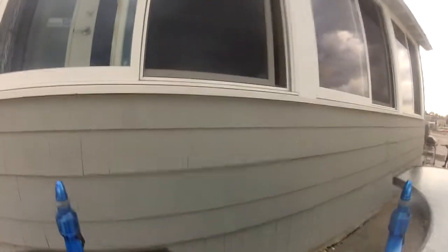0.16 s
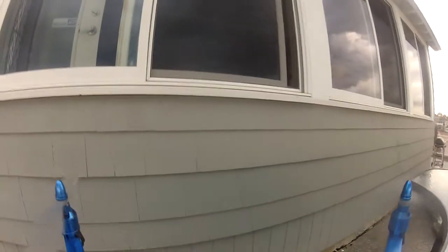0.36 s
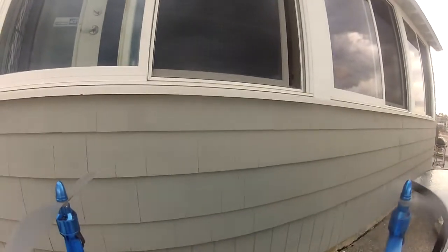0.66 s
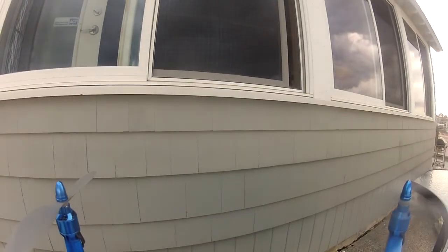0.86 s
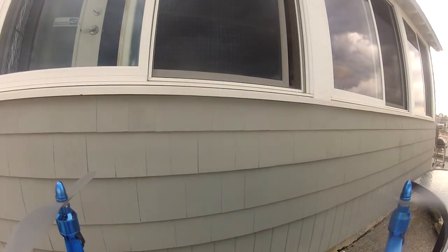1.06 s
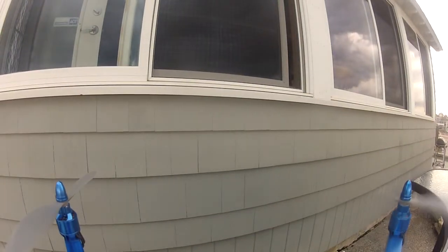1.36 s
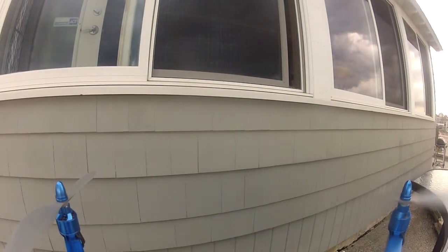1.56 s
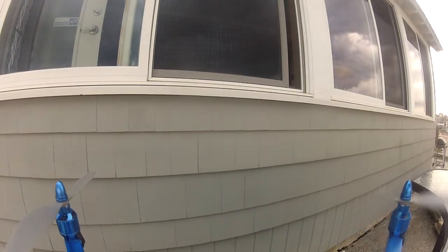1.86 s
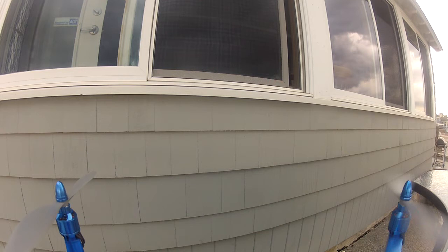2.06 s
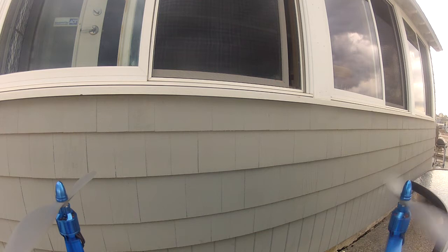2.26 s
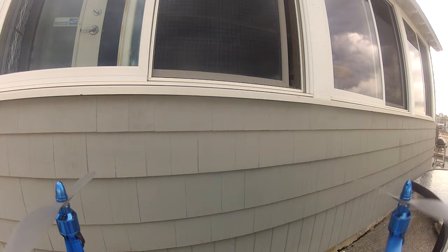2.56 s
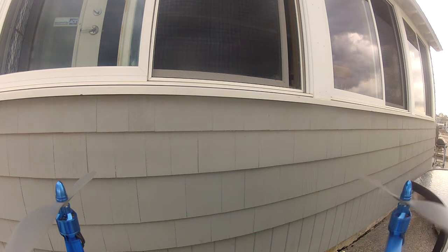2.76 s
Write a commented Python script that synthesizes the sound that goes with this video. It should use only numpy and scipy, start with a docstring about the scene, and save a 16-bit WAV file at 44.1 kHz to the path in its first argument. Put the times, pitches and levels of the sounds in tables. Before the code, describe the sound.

A small drone's motors wind down after it hits the ground with a sharp clatter. The whine falls in pitch and fades, with rattling, plastic ticks and dying propeller rumble, heard outdoors from a microphone on the drone.

```python
"""Outdoors at ground level, on the microphone of a camera fixed to a small drone's frame, close and dry.
The drone knocks down and its motors coast to a stop. The nearest rotor cogs ever slower, its orders
gliding down through the frame's resonances; the frame hums, bearings rattle, a rotor rubs, plastic snaps
and the propeller wash dies away. The camera holds each sample of a slow converter, which mirrors the
sound into the treble."""
import sys
import numpy as np
from scipy.fft import rfft, irfft, next_fast_len
from scipy.io import wavfile
from scipy.ndimage import map_coordinates

SR = 44100
rng = np.random.default_rng(int(sys.argv[2]) if len(sys.argv) > 2 else 0)


def to_wav(sig):
    """Store sig (one row per channel, or 1-D mono) as 16-bit WAV at the path in sys.argv[1].

    Samples outside -1..1 are clipped; the rate is SR.
    """
    pcm = np.clip(np.atleast_2d(sig), -1, 1) * 32767
    pcm = np.round(pcm).astype(np.int16)
    wavfile.write(sys.argv[1], SR, pcm.T)  # frames by channels


N = 127890
T = np.arange(N) / SR

# the rotor coasting down (time [s], speed [turns/s])
ROTOR_SPEED = [(0, 45.5), (.22, 38), (.36, 30.8), (.55, 26.7), (.7, 21.7), (.85, 19.4), (1.0, 16.84),
               (1.2, 14.1), (1.42, 11.4), (1.61, 9.78), (1.85, 7.72), (2.13, 5.96), (2.35, 4.82),
               (2.6, 3.39), (2.9, 1.75)]
# fade of the bearing rattle (time [s], relative level [dB])
RATTLE_FADE = [(0.04, -34), (0.22, -34), (0.37, -30), (0.59, -42), (0.77, -43.5), (1.12, -53), (1.5, -59.5),
               (2.37, -73), (2.9, -89.5)]
# resonances of the shell (frequency [Hz], gain [dB])
SHELL_RESPONSE = [(200, 1), (520, -24.5), (750, -13), (930, 0), (1080, -8), (1250, 1), (1400, -10.5),
                  (1560, -3.5), (1650, -4.5), (1780, 5.5), (2030, -9), (2250, 0), (2480, -6), (2620, -33),
                  (2820, -8.5), (3150, -31), (3650, -9), (4300, -49), (4900, -24.5), (5900, -52)]


def amp(db):
    """Decibels to gain."""
    return 10 ** (np.asarray(db) / 20)


def unit(x):
    """Scale to rms 1."""
    return x / np.sqrt(np.mean(x ** 2) + 1e-20)


def curve(rows, column=1):
    """One value per sample from a column of a time table."""
    rows = np.array(rows)
    return np.interp(T, rows[:, 0], rows[:, column])


def gain(points, hz):
    """Gain at hz from (frequency [Hz], gain [dB]) points on a log axis."""
    f, db = np.transpose(points)
    return amp(np.interp(np.log(hz + 1), np.log(f), db))


def wobble(rate):
    """A smooth random curve, rate knots a second."""
    return map_coordinates(rng.standard_normal(400), [T * rate], mode="wrap")


def filtered(x, response):
    """Filter x by a function of frequency."""
    size = next_fast_len(N + SR // 2)
    return irfft(rfft(x, size) * response(np.fft.rfftfreq(size, 1 / SR)), size)[:N]


def coloured(x, colour):
    """Shape x by (frequency [Hz], gain [dB]) points, at rms 1."""
    return unit(filtered(x, lambda hz: gain(colour, hz)))


def noise(colour):
    """Noise of rms 1, shaped by (frequency [Hz], gain [dB]) points."""
    return coloured(rng.standard_normal(N), colour)


def swell(start, rise):
    """A brief rise and fall that peaks rise seconds after its start."""
    u = np.maximum(T - start, 0) / rise
    return u ** 2 * np.exp(1 - u ** 2)


def landing():
    """The frame hits the ground in a quick clatter over one low thump."""
    # ground contacts (time [s], relative level [dB], rise [s])
    knocks = [(.0005, -13.5, 0.0028), (.0078, -9.5, 0.0015), (0.0176, -12.5, 0.003), (.022, -12, 0.003),
              (0.027, -6, 0.0017)]
    # high and low rings of the frame (frequency [Hz], relative level [dB], t60 [s])
    knock_modes = [(1130, -1, 0.02), (1258.7, -13, 0.1), (1870, 0, 0.048), (2353.8, 2, 0.026),
                   (3626, -1.5, 0.018)]
    thump_modes = [(45, -8, 0.092), (149.6, -12, 0.16)]
    crack = noise([(200, 4), (550, -9), (1100, -8), (1900, 3), (2700, -5.5), (3200, -12.5),
                   (3800, -24.5), (4500, -15), (6000, -26)])
    clatter = np.zeros(N)
    for start, db, rise in knocks:
        age = np.maximum(T - start, 0)
        ring = sum(amp(level - 60 * age / t60) * np.sin(2 * np.pi * hz * rng.normal(1, .0097) * age)
                   for hz, level, t60 in knock_modes)
        clatter += amp(db) * (.75 * crack * swell(start - .0005, rise) + .53 * ring)
    thump = sum(amp(db - 60 * T / t60) * np.sin(2 * np.pi * hz * T) for hz, db, t60 in thump_modes)
    return clatter + thump


def motor_whine():
    """Cogging orders fall through the frame's resonances; a lurch once a turn splits each line."""
    # strong orders of twelve slots and fourteen magnets (multiple of the shaft rate)
    orders = [12, 14, 24, 28, 36, 48, 56, 60, 70, 84, 98, 112, 120, 132, 140, 154, 168]
    # strength of each of them (relative level [dB])
    orders_db = [-11.5, 0, -15, 0, 5, 5.5, -4.5, -1, 3, 6.5, 2, -6, -4, -4, -5.5, 2.5, 4]
    # how the frame passes the whine (frequency [Hz], gain [dB])
    frame_response = [(60, -18.5), (150, -4), (230, 0.5), (310, -2.5), (380, -18), (460, -15), (560, -30),
                      (660, -14.5), (720, -21.5), (830, -4), (930, 0.5), (1050, -7), (1150, -9.5),
                      (1260, -10.5), (1450, -17.5), (1750, -15.5), (2050, -22), (2300, -18.5),
                      (2700, -38.5), (4400, -58)]
    # swell and fade of the whine (time [s], relative level [dB])
    fade = [(0, -54), (.15, -29), (.32, -23.5), (.45, -27.5), (.57, -28.5), (.7, -34), (.83, -34),
            (1.05, -40), (1.25, -42.5), (1.45, -46), (1.7, -50), (1.9, -52), (2.15, -57.5), (2.45, -61),
            (2.9, -69.5)]
    flutter, lurch_rad = .006, .012
    speed = curve(ROTOR_SPEED) * (1 + flutter * wobble(25))
    angle = 2 * np.pi * np.cumsum(speed) / SR
    angle += lurch_rad * np.sin(angle)
    strong, whine = dict(zip(orders, orders_db)), np.zeros(N)
    for k in sorted({*range(2, 130, 2), *range(1, 56, 2), *orders}):
        if k in strong:
            db = strong[k] + 2.5 * wobble(13.86) + 4.5 * wobble(70)  # slow shimmer, fast rasp
        else:
            db = rng.normal(-10, 2)
        whine += amp(db) * gain(frame_response, k * speed) * np.sin(k * angle + rng.uniform(0, 2 * np.pi))
    return amp(curve(fade) - 7.5) * whine


def bending_mode(levels, pitch, wander, shake):
    """One low mode of the frame hums; random shaking unsettles its level and phase."""
    hz = curve(pitch) * (1 + wander * wobble(30))
    phase = 2 * np.pi * np.cumsum(hz) / SR + rng.uniform(0, 2 * np.pi)
    tone = (1 + shake * wobble(45)) * np.sin(phase) + shake * wobble(45) * np.cos(phase)
    return amp(curve(levels)) * unit(tone)


def frame_hum():
    """The frame under the microphone bends in two low modes."""
    # strength of each mode (time [s], relative level [dB])
    lower_db = [(0.04, -20), (0.06, -24), (0.46, -17), (0.52, -33), (0.54, -27), (0.87, -37.5), (0.92, -36),
                (1.04, -30), (1.15, -60), (1.2, -41.5), (2.01, -54), (2.27, -37), (2.59, -60.5),
                (2.87, -40), (2.9, -51.5)]
    upper_db = [(0.0, -17), (0.14, -18.5), (0.44, -17), (0.45, -25.5), (0.68, -32), (0.7, -34.5),
                (0.9, -36), (1.07, -50.5), (1.44, -52), (1.61, -35.5), (1.66, -57), (1.7, -37), (2.45, -51),
                (2.56, -37.5), (2.9, -67.5)]
    # pitch of each mode (time [s], frequency [Hz])
    lower_hz = [(0, 78.66), (.4, 72.9), (1.401, 75.99), (2.9, 73.29)]
    upper_hz = [(0, 127.8), (0.082, 99), (.45, 101.4), (0.621, 114.3), (0.999, 113.3), (1.58, 125.5),
                (1.72, 124.9), (1.839, 108.1), (1.96, 124.3), (2.15, 110.8), (2.57, 124), (2.801, 101)]
    lower = bending_mode(lower_db, lower_hz, wander=.02, shake=.38)
    upper = bending_mode(upper_db, upper_hz, wander=.028, shake=.61)
    return amp(-4) * lower + amp(-3) * upper


def propeller_wash():
    """Air from the propellers rumbles at the microphone and dies away."""
    # strength of the wash (time [s], relative level [dB])
    fade = [(0.0, -58), (0.08, -25), (0.37, -23.5), (0.5, -29), (0.62, -34), (1.1, -45.5), (1.5, -55.5),
            (2.0, -54.5), (2.9, -62.5)]
    # its spectrum (frequency [Hz], gain [dB])
    colour = [(10, -4.5), (17, 4.5), (28, -4), (50, 3.5), (120, 6), (165, -4), (240, -13.5), (320, -10),
              (380, -20.5), (550, -28.5), (900, -33.5), (3000, -54.5)]
    return amp(curve(fade) + 2) * noise(colour)


def outdoor_air():
    """A faint, steady outdoor background."""
    # spectrum of the air (frequency [Hz], gain [dB])
    colour = [(30, -9), (100, 3.5), (300, -8), (600, -13), (1200, -16), (2500, -20.5), (4800, -25),
              (6000, -35)]
    return amp(-62.5) * noise(colour)


def bearing_rattle(hits_per_s=870):
    """Dense small impacts in the bearings ring the shell."""
    hits = (rng.random(N) < hits_per_s / SR) * rng.standard_normal(N)
    return amp(curve(RATTLE_FADE) + .5 + 2.1 * wobble(60)) * coloured(hits, SHELL_RESPONSE)


def crackle(ticks_per_s=180, end_s=1.17):
    """Sparse sharp ticks while the rotors are still fast."""
    hits = (rng.random(N) < ticks_per_s / SR) * rng.uniform(.3, 1, N) * rng.choice([-1, 1], N)
    ticks = coloured(hits, [(1000, -8.5), (3500, 3.5), (6000, -19)])
    rattle_db = curve(RATTLE_FADE)
    db = rattle_db.max() + .65 * (rattle_db - rattle_db.max())  # fades more slowly than the rattle
    return amp(db - 25.5) * ticks * (T < end_s)


def rotor_rubs():
    """A rotor rubs in passing and rings the shell; the rubs lengthen as it slows to 9 turns/s."""
    # contacts (time [s], relative level [dB])
    contacts = [(0.048, -19), (0.079, -10.5), (0.1047, -27), (0.141, -24.5), (0.175, -9), (0.195, -16),
                (0.2303, -22), (0.264, -22), (0.2728, -12), (0.3203, -15.5), (0.333, -9.5), (0.3616, -8),
                (0.383, -16.5), (0.4306, -17), (0.4482, -17), (0.4905, -13), (0.5292, -22), (0.55, -24),
                (0.577, -24.5), (0.5981, -14.5), (0.6287, -17.5), (0.649, -28), (0.675, -29),
                (0.7373, -25.5), (0.79, -26.5), (0.823, -23), (0.8643, -29), (0.897, -32.5), (0.9152, -26),
                (0.9275, -27), (0.9806, -26.5), (1.0375, -35), (1.1014, -40), (1.1255, -24.5),
                (1.1629, -33.5), (1.1954, -28), (1.231, -35), (1.3767, -36.5), (1.5019, -36.5),
                (1.5915, -32), (1.689, -31), (1.8006, -36.5), (1.931, -36.5), (1.9907, -39.5),
                (2.003, -37.5), (2.068, -34.5), (2.2454, -43), (2.3506, -50.5), (2.5709, -52.5)]
    # treble lost in a soft contact (frequency [Hz], gain [dB])
    softness = [(2500, -2.5), (3600, -11), (5000, -8)]
    rise_turns = .045
    speed, rubs = curve(ROTOR_SPEED), np.zeros(N)
    hz = np.fft.rfftfreq(SR // 8, 1 / SR)
    for time, db in contacts:
        rise = rise_turns / max(np.interp(time, T, speed), 9) + .0047
        shift = 1 + .03 * rng.uniform(-.86, 1)  # the ring moves with the point of contact
        ring = gain(SHELL_RESPONSE, hz * shift) * gain(softness, hz)
        grain = unit(irfft(ring * np.exp(2j * np.pi * rng.random(len(hz)))))
        rubs += amp(db - 9.5) * swell(time - .73 * rise, rise) * np.resize(grain, N)
    return rubs


def plastic_snaps():
    """Short bright snaps of plastic while the frame still shakes."""
    # snaps (time [s], relative level [dB])
    snaps = [(0.0664, -34), (0.2772, -37.5), (0.3334, -32.5), (0.3846, -35), (0.4475, -44), (0.4949, -41),
             (0.5532, -35), (0.5982, -42), (0.9643, -50), (0.9793, -62), (1.0169, -53), (1.0704, -56)]
    envelope = sum(amp(db - .5) * swell(time - .0005, rise=.0017) for time, db in snaps)
    return envelope * noise([(1500, -5.5), (3600, 2.5), (4300, -8.5), (5000, 0), (6000, -17)])


def squeal():
    """One thin falling squeal with a flickering level."""
    # its glide (time [s], frequency [Hz], level [dB])
    glide = [(.63, 4030, -62), (.69, 3760, -57.5), (.73, 3707, -49.5), (.775, 3500, -50.5),
             (.795, 3200, -60), (.81, 3100, -100)]
    tone = np.sin(2 * np.pi * np.cumsum(curve(glide)) / SR)
    return amp(curve(glide, column=2) + 1.7 * wobble(59.9)) * tone * (T > glide[0][0])


def click():
    """One small click late in the run-down."""
    burst = noise([(1500, -20), (2400, 4.5), (2900, 4.5), (4000, -5), (6000, -21.5)])
    return amp(-58) * swell(start=2.195, rise=.017) * burst


def scene():
    """Everything meets at the one microphone on the frame, with no room."""
    mix = landing() + motor_whine() + frame_hum() + propeller_wash() + outdoor_air()
    mix += bearing_rattle() + crackle() + rotor_rubs() + plastic_snaps() + squeal() + click()
    return mix[None]


def record(dry):
    """Sample and hold mirrors the band around the converter's rate; then clipping and the band limit."""
    hold_hz, top_hz = 12000, 15600
    # the camera's tone (frequency [Hz], gain [dB])
    tone = [(9000, 1.5), (14000, 3.5), (14800, 0), (15600, -12)]
    low = filtered(dry[0], lambda hz: 1 / np.sqrt(1 + (2 * hz / hold_hz) ** 30))
    mirrored = low * (1 + 2 * np.cos(2 * np.pi * hold_hz * T))
    held = filtered(mirrored, lambda hz: np.sinc(hz / hold_hz) * gain(tone, hz))
    return filtered(np.clip(held, -1, 1), lambda hz: hz < top_hz)[None]


dry = scene()
out = record(dry)
to_wav(out)
```